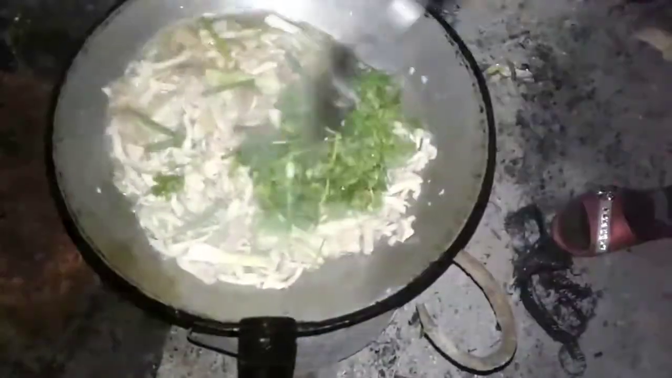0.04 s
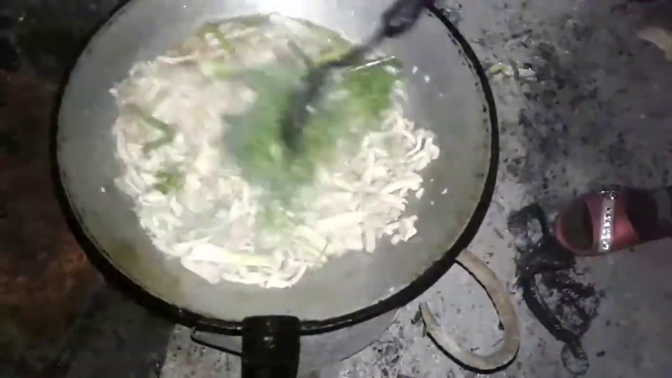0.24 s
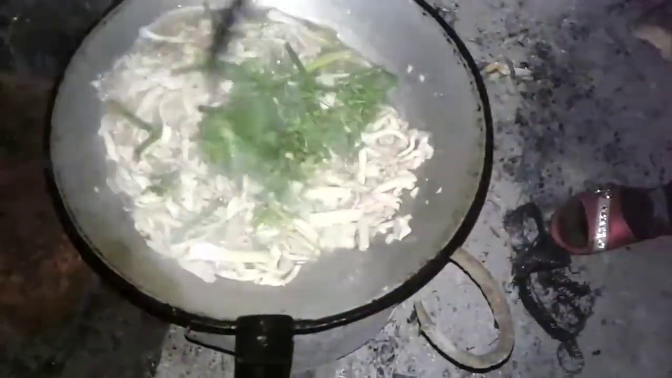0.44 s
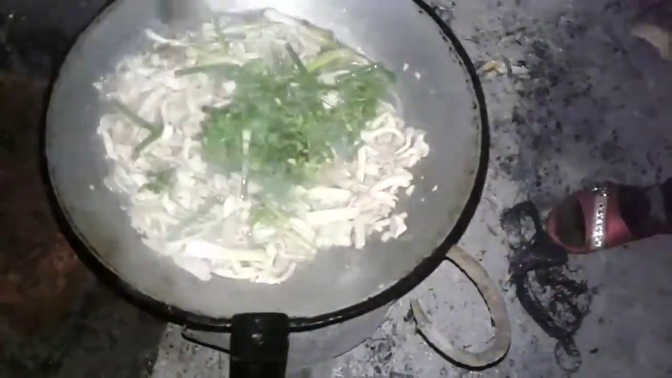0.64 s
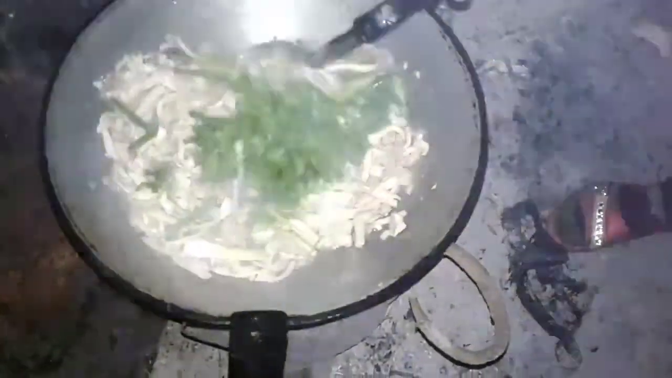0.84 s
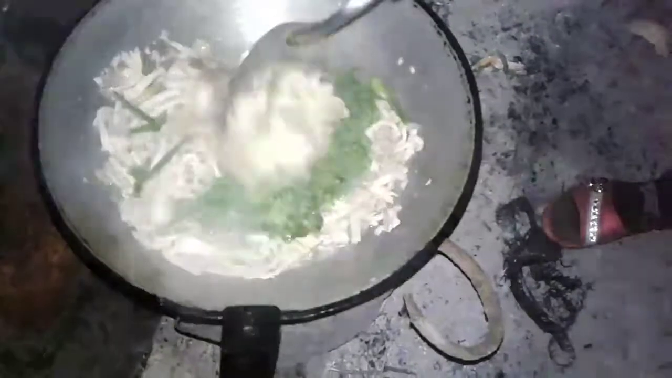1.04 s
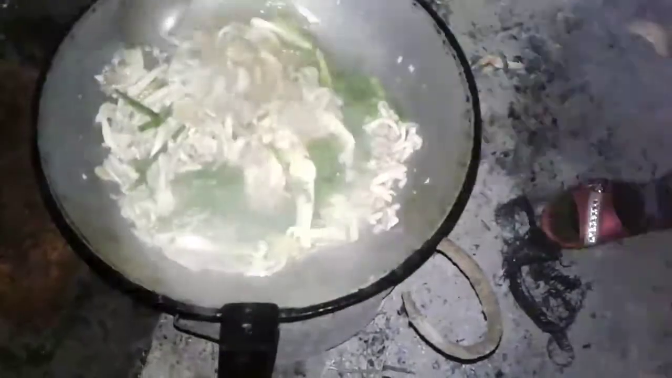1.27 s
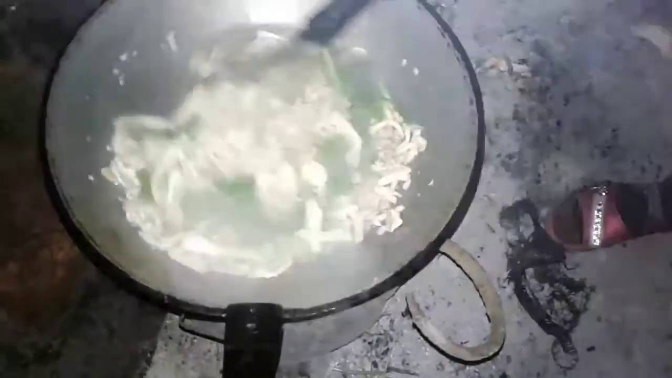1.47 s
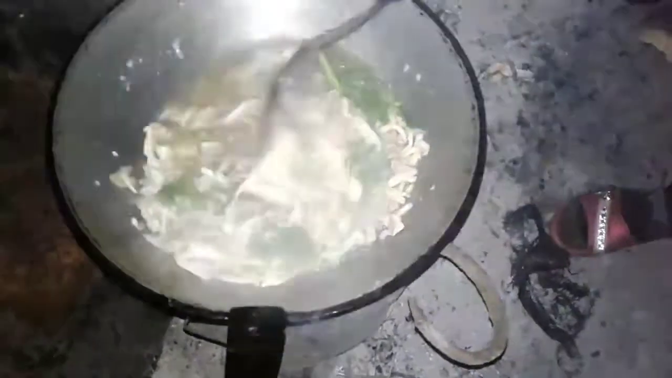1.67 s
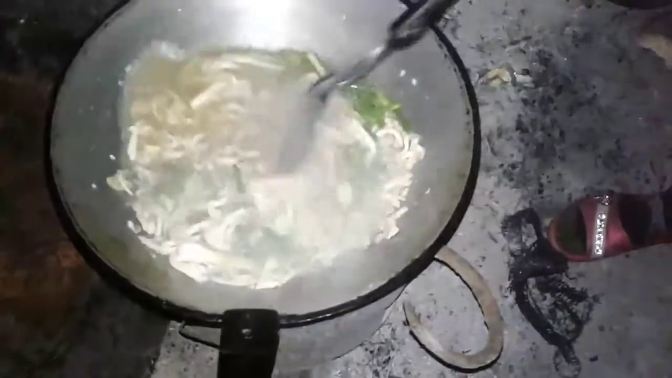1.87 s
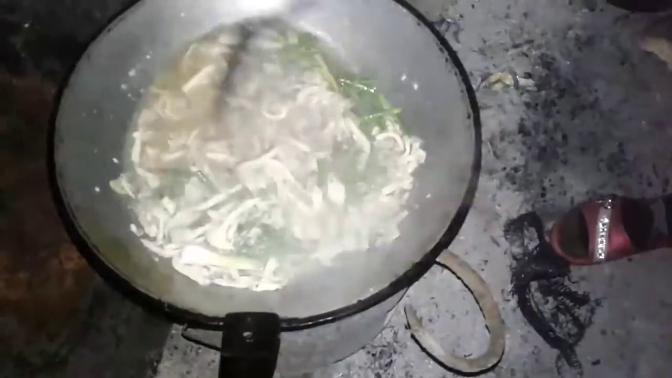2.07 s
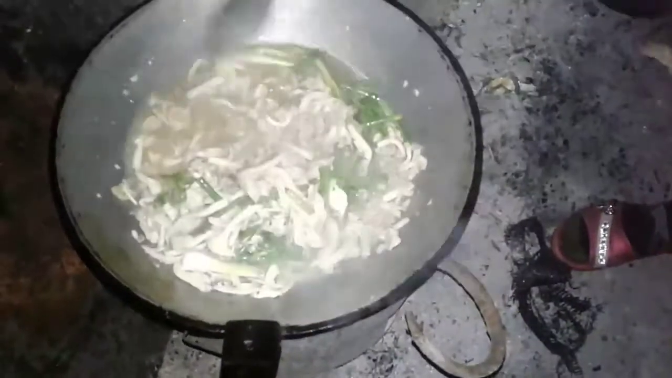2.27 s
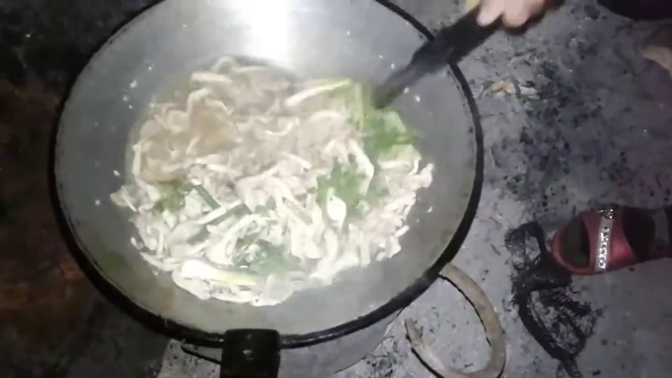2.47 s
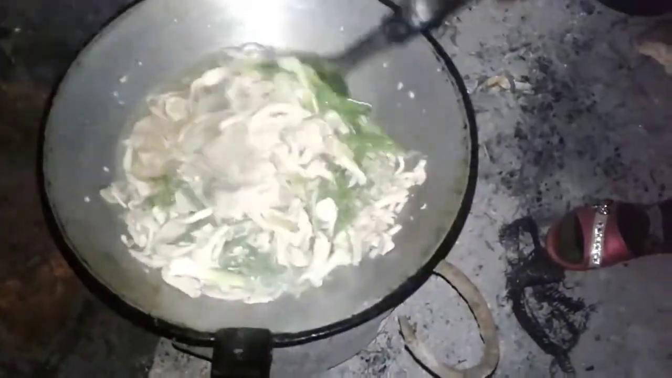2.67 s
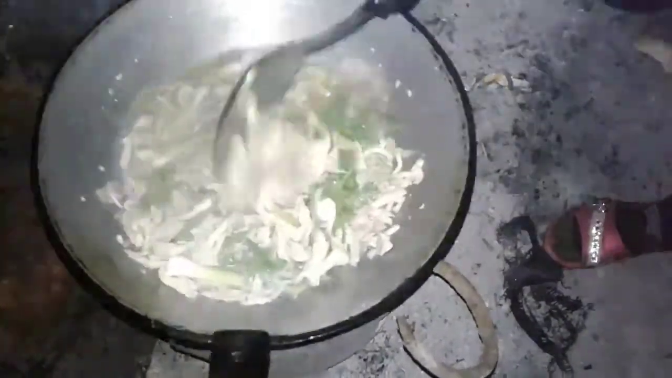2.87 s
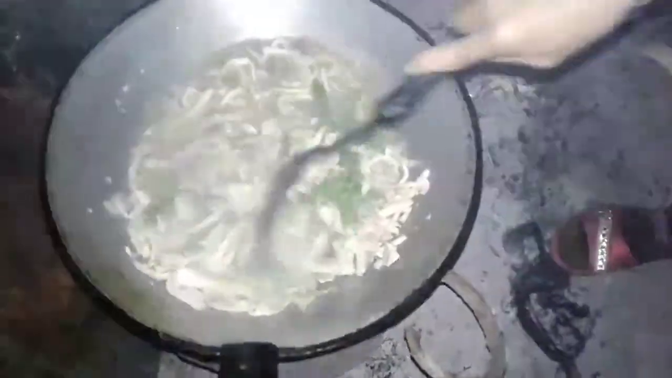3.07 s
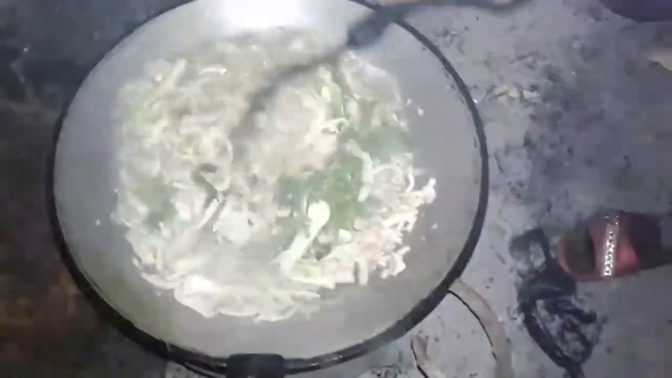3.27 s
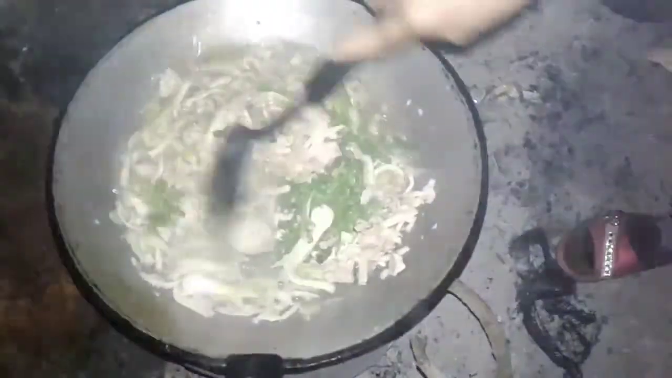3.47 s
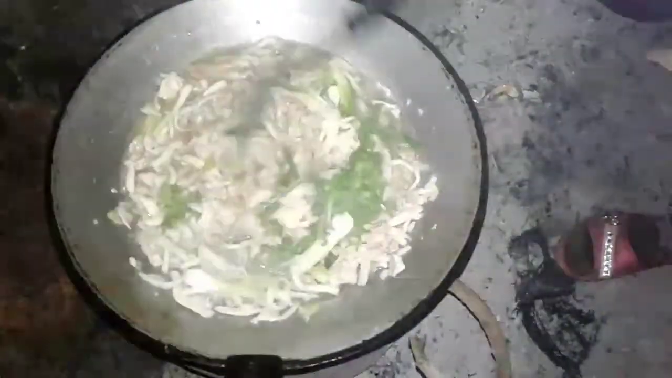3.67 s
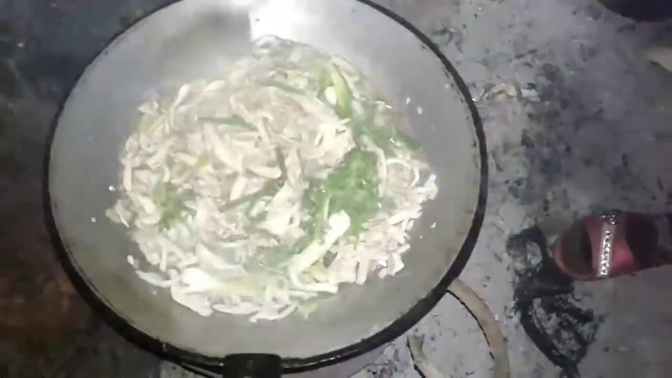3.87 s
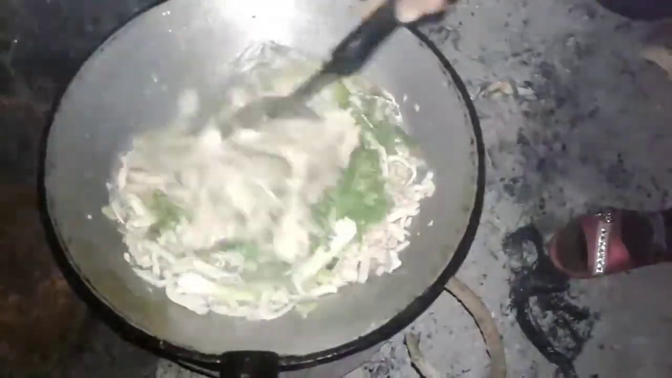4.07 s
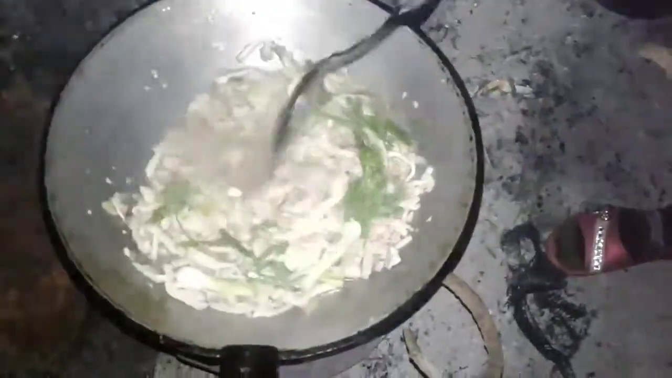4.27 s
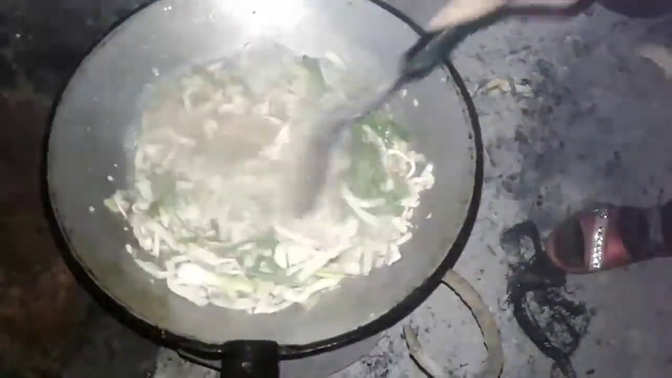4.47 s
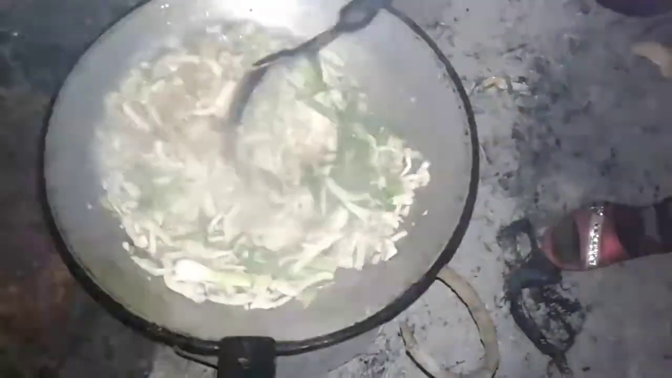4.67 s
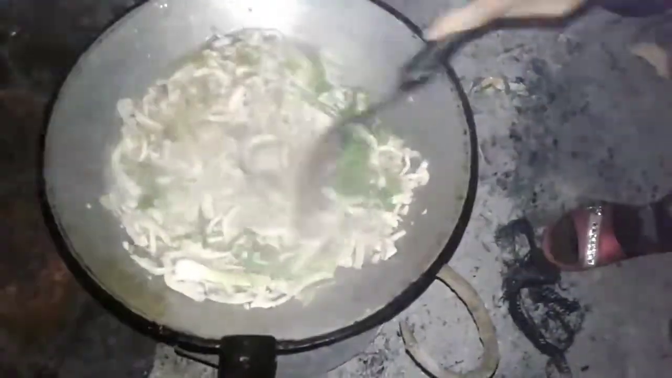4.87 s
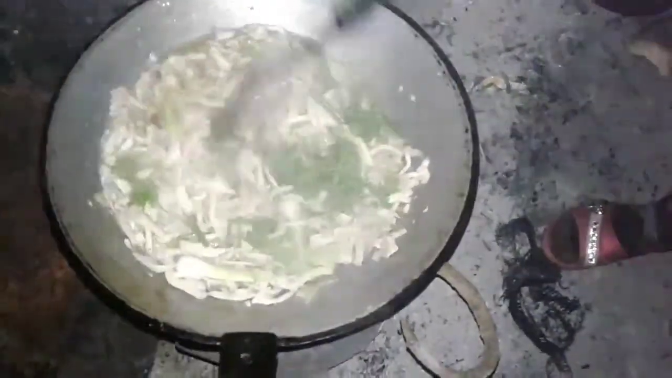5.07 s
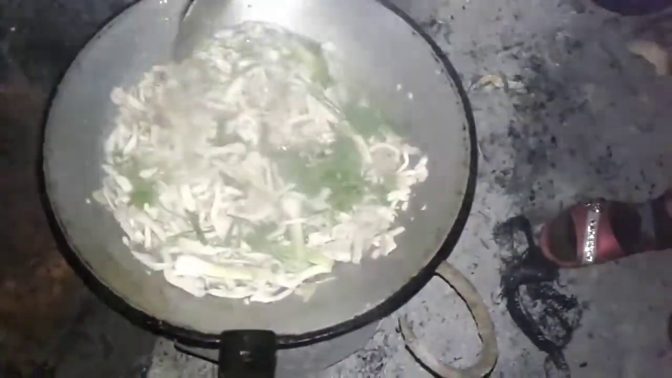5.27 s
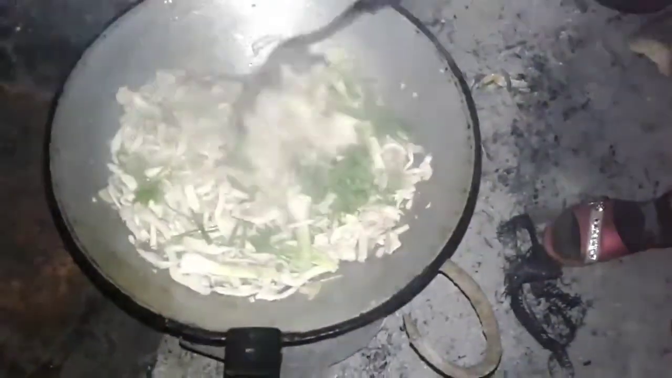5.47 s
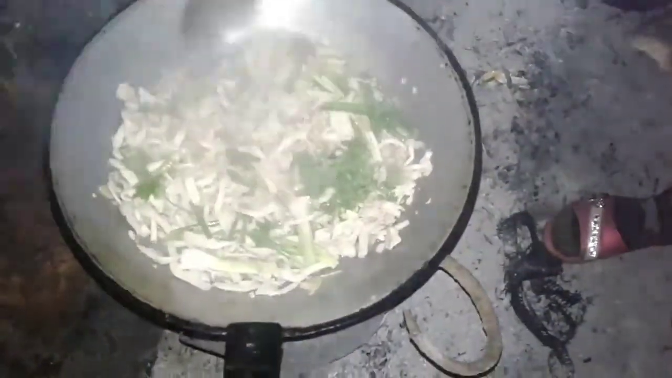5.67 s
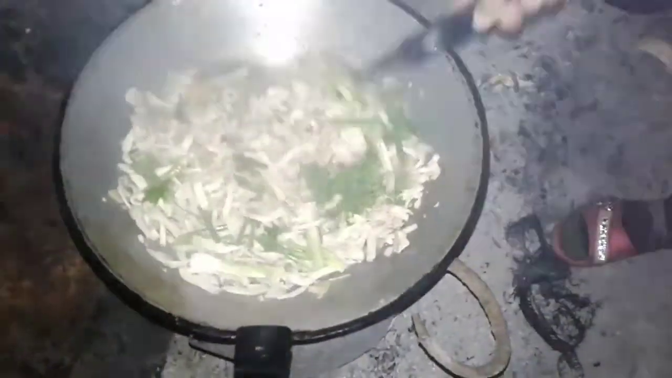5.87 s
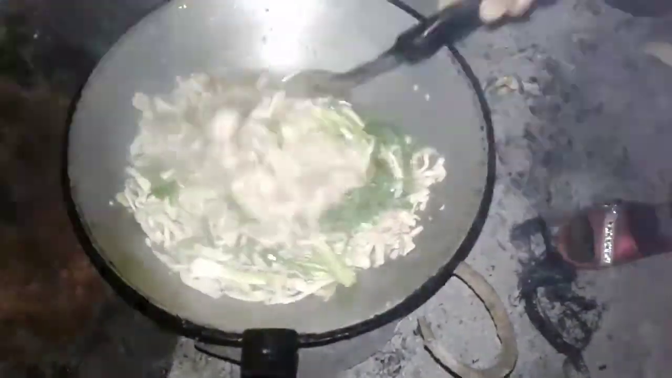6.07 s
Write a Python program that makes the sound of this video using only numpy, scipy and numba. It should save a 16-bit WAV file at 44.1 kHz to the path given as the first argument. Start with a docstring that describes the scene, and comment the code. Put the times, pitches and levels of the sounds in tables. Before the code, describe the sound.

Outdoors at night, a metal spatula stir-fries in a wok close to the microphone, slightly to the right. Four loud, short clacks and one much softer knock each lead into a quick scrape sagging in pitch, with dull wet pats as food is turned. Small oil spits tick. Crickets trill continuously, mostly toward the right, above a quiet flame rumble and faint sizzle.

```python
"""Crickets trill all around over the low rumble of a stove and a faint sizzle: stir-frying outdoors at night.
A metal spatula knocks on the wall of a wok, slides down it and turns the wet food; hot oil spits.
Contact forces drive band-pass modes of the steel, and the food damps them, so each knock is a short clack;
the ring sags in pitch as the blade slides deeper. Insect trills are gliding tones pulsed by wing strokes,
a bush cricket is coloured noise in swells, and the stove and sizzle are filtered noise."""
import sys
import numpy as np
from scipy import signal
from scipy.fft import rfft, irfft
from scipy.io import wavfile
from scipy.ndimage import uniform_filter1d
from numba import njit

SR = 44100
rng = np.random.default_rng(int(sys.argv[2]) if len(sys.argv) > 2 else 0)


def pcm_store(signal):
    """Save signal as 16-bit PCM."""
    levels = np.round(np.clip(np.atleast_2d(signal), -1, 1) * 32767)
    wavfile.write(sys.argv[1], SR, levels.astype(np.int16).T)


N = 270282
T = np.arange(N) / SR  # time [s]


def undb(db):
    """Level to amplitude: 20 dB is a factor of ten."""
    return 10 ** (np.asarray(db) / 20)


def unit(x):
    """Normalisation to an rms amplitude of 1."""
    return x / np.sqrt(np.mean(x ** 2) + 1e-20)


def pan(db):
    """Interaural level difference: left and right gains, left minus right in dB."""
    return undb(np.array([[db], [-db]]) / 2)


def add(track, start_s, sound):
    """Superposition: a sound is summed into a track from its start time."""
    rest = track[max(int(start_s * SR), 0):]
    rest[:len(sound)] += sound[:len(rest)]


def walk(rate):
    """Smoothed random fluctuation: a moving mean over random steps, rate per second, spread near 1."""
    step = int(SR / rate)
    levels = np.repeat(rng.standard_normal(N // step + 1), step)
    return 1.2 * uniform_filter1d(levels, step)[:N]


def colour(x, points):
    """Linear filtering in the frequency domain through points of (frequency [Hz], gain [dB])."""
    hz, db = np.transpose(points)
    f = np.fft.rfftfreq(x.shape[-1], 1 / SR) + 1
    gain = undb(np.interp(np.log(f), np.log(hz), db))
    return irfft(rfft(x) * gain, x.shape[-1])


@njit
def svf(x, hz, width):
    """State-variable resonator: two coupled integrators form a band-pass whose centre may move."""
    y, b, l = np.empty(len(x)), 0., 0.
    for i in range(len(x)):
        g, k = np.tan(np.pi * hz[i] / SR), width / hz[i]
        v = (b + g * (x[i] - l)) / (1 + g * (g + k))
        b, l, y[i] = 2 * v - b, l + 2 * g * v, k * v
    return y


def band(x, hz, width):
    """Simple resonance: one damped mode with gain 1 at its centre, centre and width in Hz."""
    centre = np.clip(hz * np.ones(len(x)), 20, .45 * SR)
    return svf(x, centre, float(width))


def echoes(x, t60):
    """Diffuse reverberation: convolution with decaying noise, unrelated left and right."""
    t = T[:SR // 2]
    # the first 2 ms hold no reflections
    tail = rng.standard_normal((2, len(t))) * undb(-60 * t / t60) * (t > .002)
    tail = tail / np.sqrt(np.sum(tail ** 2, axis=1, keepdims=True))
    return signal.fftconvolve(x[None], tail, axes=1)[:, :N]


def stove():
    """Broadband noise sources: a low flame rumble alike on both sides and a fine, diffuse sizzle."""
    # spectral shape of the flame: (frequency [Hz], relative level [dB])
    flame_spectrum = [(20, -42), (40, -19), (62, -2), (100, -1), (170, -3), (260, -9.5), (500, -16),
                      (1000, -19), (2500, -40)]
    # spectral shape of the sizzle blended with far insects: (frequency [Hz], relative level [dB])
    sizzle_spectrum = [(30, -4), (150, 5), (600, -1.5), (1400, -1.5), (1900, 9), (2550, 0.5), (3500, 6.5),
                       (4500, 5), (5300, 0.5), (7300, 2), (8100, -4.5), (9300, -4.5), (11500, -19),
                       (15500, -21)]
    rumble_db, sizzle_db = -55.5, -53  # before the random drift and the panning
    rumble = unit(colour(rng.standard_normal(N), flame_spectrum))
    rumble = rumble * undb(rumble_db + 1.03 * walk(13))
    sizzle = unit(colour(rng.standard_normal((2, N)), sizzle_spectrum))
    sizzle = sizzle * undb(sizzle_db + .5 * walk(4.68) + 2.34 * walk(250))
    return pan(-0.47) * rumble + pan(-6.0) * sizzle


def wings(hz, rate, glide, duty=0.91, unsteady=.01, flutter_db=2.0):
    """Stridulation: each closing of the wings draws file over scraper, one short gliding tone of uneven strength."""
    strokes = np.cumsum(rate * (1 + unsteady * walk(14))) / SR
    stroke = (strokes + rng.random()) % 1  # position within the stroke, 0 to 1
    pitch = hz * (1 + glide * (stroke - .5) + .008 * walk(110))
    pressure = np.sin(np.pi * np.minimum(stroke / min(duty, 1), 1)) * undb(flutter_db * walk(40))
    return unit(pressure * np.sin(2 * np.pi * np.cumsum(pitch) / SR))


def afar(song, pan_db, wet=1.0, t60=0.21):
    """Direct-to-reverberant ratio: a singer out in the yard is half lost in its reflections."""
    return pan(pan_db) * (song + wet * echoes(song, t60)) / np.hypot(1, wet)


def from_beat(rate, first_s):
    """Phase accumulation: seconds to the nearest beat of a rhythm whose rate may change."""
    beats = np.cumsum(rate) / SR - first_s * rate[0]
    return abs((beats + .5) % 1 - .5) / rate


def singer():
    """Amplitude gating: one cricket's trill comes in phrases, each about twice as long as the pause."""
    # phrase rhythm, which hurries for a while: (time [s], phrase rate [1/s])
    phrase_tempo = [(0, 2.88), (2.5, 2.55), (3.4, 3.12), (4.6, 3.24), (5.3, 2.33), (6.1, 2.91)]
    first_middle_s, duty, ramp_s, level_db = 0.093, 0.67, 0.049, -53.5  # level within a phrase
    tempo = np.interp(T, *np.transpose(phrase_tempo))
    inside_s = duty / tempo / 2 - from_beat(tempo, first_middle_s)  # time within the phrase edges
    gate = np.clip(inside_s / ramp_s + .5, 0, 1)
    song = afar(wings(2972, 59.5, -0.07, duty=0.82, flutter_db=2), pan_db=-4, wet=1.0)
    return unit(song) * undb(level_db) * gate


def bush_cricket():
    """Amplitude-modulated noise: short toothy rasps swell and fade in a loose rhythm."""
    first_s, rasps_per_s, unsteady = 0.12, 4.02, 0.054
    half_width_s, level_db = 0.056, -57.5  # half-width where the swell is 1/e; level before the swell
    rate = rasps_per_s * (1 + unsteady * walk(2.98))
    swell = np.exp(-(from_beat(rate, first_s) / half_width_s) ** 2)
    spectrum = [(3300, 4.5), (3900, -7.0), (4700, 13.0), (5050, 11.0), (5600, -31.5)]
    rasp = unit(colour(rng.standard_normal(N), spectrum))
    return afar(rasp * swell * undb(level_db + 2 * walk(200)), pan_db=-6.5)


def crickets():
    """Superposed stridulation: steady trills, one singer in phrases and a rasping bush cricket."""
    # crickets that trill without pause: (mean pitch [Hz], wing-stroke rate [1/s],
    # glide within a stroke [share of pitch], level [dB], left minus right [dB])
    trill_table = [(2176, 112, -0.0028, -47, -40), (2071, 57, -0.048, -50, -38),
                   (2219, 63, 0.014, -51.5, -4), (2145, 110, -0.12, -49.5, -12),
                   (2188, 95, -0.075, -52.5, -24), (3040, 46, -0.177, -61, -9), (3374, 29, -0.17, -61.5, 3),
                   (6084, 60, 0.19, -61.5, -6), (6430, 69, 0.3, -59, 10), (6820, 51, 0.085, -62, 28),
                   (9020, 48, 0.11, -70.5, 4.5)]
    trills = 0
    for hz, rate, glide, db, pan_db in trill_table:
        trills = trills + undb(db) * unit(afar(wings(hz, rate, glide), pan_db))
    return trills + singer() + bush_cricket()


def faint_spits():
    """Uniformly random arrivals: small droplets burst at any time, as rows like those of the loud spits."""
    per_s, mean_db, mean_ring_db, scatter_db = 1.5, -55, 12, 4
    rows = []
    for when, size, ring in rng.random((int(per_s * N / SR), 3)):
        tick_db = mean_db + scatter_db * (2 * size - 1)
        ring_db = mean_ring_db + scatter_db * (2 * ring - 1)
        rows.append((when * N / SR, tick_db, ring_db))
    return rows


def spits(decay_s=0.0017, spit_db=2, bubble_hz=4700, bubble_db=-2):
    """Bubble resonance: droplets burst in hot oil with a tick and the short ring of a small bubble."""
    # the loudest spits, before the common offsets spit_db and bubble_db:
    # (time [s], peak level [dB], bubble ring relative to that level [dB])
    loud_spits = [(0.073, -44, 9), (3.3378, -56.5, 24), (3.729, -54, 20.5), (4.2133, -47, -4),
                  (4.4882, -42, 2), (4.8599, -50, 14)]
    out, t = np.zeros(N), T[:SR // 50]
    for s, db, ring_db in loud_spits + faint_spits():
        burst = rng.standard_normal(len(t)) * np.exp(-t / decay_s)
        tick = band(burst, 11300, 9000)
        ring = band(burst, bubble_hz, 600)
        tick = undb(db + spit_db) * tick / abs(tick).max()
        ring = undb(db + ring_db + bubble_db) * ring / abs(ring).max()
        add(out, s, tick + ring)
    return out


def steel(force, sag=0.96, body_db=0., treble_db=0., spot_hz=3700, spot_db=0., scatter=0.0063, sag_below_hz=3800):
    """Modal synthesis: a force drives the wok's modes; the contact favours some and shifts the lower ones most."""
    # modes of the wok with the blade on it, before sag and scatter:
    # (frequency [Hz], bandwidth before a floor of frequency / 45 [Hz], gain before tilt and favour [dB])
    modes = [(113, 11.7, -2), (270, 85, -9), (408, 46, -8.5), (617, 94, -5.5), (986, 50, -1.5),
             (1244, 117, -2.5), (1534, 133, 1), (2228, 118, 7), (2610, 41, -3), (2566, 44, 10),
             (2870, 140, 11), (3633, 150, 10), (4038, 42, 11), (4470, 57, 0), (4740, 400, -4),
             (4694, 220, 6), (6000, 270, -16), (7020, 100, -10.5), (7320, 230, -12), (9340, 120, -8.5),
             (9380, 470, -4.5), (10830, 70, -10.5), (13800, 200, -21), (14400, 330, -13)]
    out = 0
    for k, (hz, width, db) in enumerate(modes):
        lowered = sag ** (1 / (1 + (hz / sag_below_hz) ** 4))
        centre = hz * (1 + scatter * rng.standard_normal()) * lowered
        tilt_db = np.interp(hz, [1600, 2400, 4500, 9000], [body_db, 0, 0, treble_db])
        favour_db = spot_db * np.exp(-((hz - spot_hz) / 300) ** 2)
        gain = (-1) ** k * undb(db + tilt_db + favour_db)  # rows alternate in sign
        out = out + gain * band(force, centre, max(width, hz / 45))
    return out


def drops():
    """Jittered arrivals: pieces of turned food fall back at uneven moments, as rows like those of the pats."""
    # the blade turns the food over: (start [s], end [s], typical peak level before the pats' offset [dB])
    turns = [(1.331, 1.5, -43), (2.618, 3.03, -38), (3.56, 3.64, -41), (4.45, 4.6, -37.5),
             (4.82, 4.91, -42)]
    per_s, middle_hz, spread_octaves, scatter_db, steel_share_db = 30, 1320, .7, 4, -7
    rows = []
    for start, end, db in turns:
        slots = np.arange(start, end, 1 / per_s)
        for s, (late, size, pitch) in zip(slots, 2 * rng.random((len(slots), 3)) - 1):
            hz = middle_hz * 2 ** (spread_octaves * pitch)
            rows.append((s + late / per_s / 2, db + scatter_db * size, hz, steel_share_db))
    return rows


def pats(decay_s=0.0043, width_hz=800, pat_db=-2, steel_db=3, splash=0.23):
    """Damped impact: wet food cushions the blade, giving a brief dull pat with a trace of steel."""
    # the clearest pats, before the common offsets pat_db and steel_db:
    # (time [s], peak level [dB], centre frequency [Hz], steel relative to wet part [dB])
    clear_pats = [(0.705, -30, 810, -19), (0.739, -28, 1590, -18), (0.912, -34.5, 1410, -10),
                  (2.386, -25.5, 638, 7), (2.462, -31.5, 1940, -17), (2.648, -31.5, 909, -4),
                  (2.724, -29.5, 1250, 4), (2.807, -30, 1010, 0), (2.99, -29.5, 1020, -1.5),
                  (3.58, -35, 775, -12), (4.083, -31, 700, -25), (4.353, -29.5, 1860, 10),
                  (4.477, -29.5, 1390, -15), (5.802, -34, 683, -16), (5.844, -32, 1370, -24),
                  (5.905, -32.5, 1875, -16)]
    out, t = np.zeros(N), T[:SR // 16]
    for s, db, hz, steel_share_db in clear_pats + drops():
        force = (t == 0) + splash * rng.standard_normal(len(t)) * np.exp(-t / decay_s)
        wet = band(band(force, hz, width_hz), hz, 2 * width_hz)
        ring = steel(force, body_db=3, treble_db=-6)
        # the two parts share the peak level
        share = undb(steel_share_db + steel_db)
        both = wet / abs(wet).max() + share * ring / abs(ring).max()
        add(out, s, undb(db + pat_db) * both / np.hypot(1, share))
    return out


def slides(sag_per_s=2.31, start_pitch=1.005, grain_db=3, judder_db=2, release_db=-19, dry_rub_db=-9, grit_db=-12):
    """Stick-slip friction: tiny slips ring the wok, lower and lower as the blade runs down into the food."""
    # slides down the wall: (start [s], turning point of the slide [s], end [s], rasp at the start [dB],
    # rasp at the turning point [dB], rub through the food before its course with depth [dB])
    slide_table = [(0.547, 0.612, .715, -38.5, -33, -42), (2.19, 2.285, 2.368, -40.5, -33.5, -47),
                   (3.804, 3.813, 3.945, -32, -43, -45.5), (5.242, 5.307, 5.335, -34, -38, -44),
                   (5.642, 5.716, 5.825, -47, -42.5, -43)]
    out, judder = np.zeros(N), undb(judder_db * walk(130))
    for start, turning, end, first_db, turning_db, rub_db in slide_table:
        span = (T > start) & (T < end)
        t = T[span]
        depth = np.interp(t, [start, turning, end], [-1, 0, 1])  # -1 high on the bare wall, 1 deep in the food
        grain = undb(grain_db * np.minimum(rng.exponential(size=len(t)), 4))
        slips = rng.standard_normal(len(t)) * grain * judder[span]
        ring = steel(slips, sag=start_pitch * np.exp(-sag_per_s * (t - start)))
        bright = unit(colour(ring, [(1200, -4), (2300, -5.5), (3600, 3.0), (5000, 4), (9000, -21), (15000, -3)]))
        dull = unit(colour(ring, [(300, -14), (750, 15), (1500, 4.5), (2300, -33), (4000, -46)]))
        # the air pocket under the blade deepens: one hollow resonance falls
        pocket_hz = np.interp(depth, [-0.72, 0.17, 0.43, 0.69], [1650, 1270, 845, 675])
        pocket = unit(band(band(slips, pocket_hz, 220), pocket_hz, 400))
        dull = unit(dull + 1.2 * pocket)
        # the edge spits dry grit, most strongly just before the turning point
        grit = unit(colour(slips, [(1000, -1), (5000, 2.5), (6500, -3.5), (11000, -8), (15000, -21)]))
        grit = grit * undb(grit_db + np.interp(depth, [-1, -.15, .6], [-6, 4, -8]))
        rasp_db = np.interp(depth, [-1, 0], [first_db, turning_db]) + release_db * np.maximum(depth, 0) ** 2
        food_db = rub_db + np.interp(depth, [-0.93, 0.025, 0.23, 1.0], [dry_rub_db / 2, dry_rub_db, 1, -10])
        sound = (bright + grit) * undb(rasp_db) + dull * undb(food_db)
        out[span] += sound * signal.windows.tukey(len(t), .1)
    return out


def knocks(grit=0.12, grit_s=0.0042, edge_db=-3, boom_rise_s=0.0096, crack_db=2, crack_s=0.00082):
    """Impact excitation: the blade lands edge by edge, rebounds and chatters; the whole bowl booms just after."""
    # blade meets wok: (time [s], level [dB], second edge after [s], rebound after [s], rebound level [dB],
    # body tilt [dB], treble tilt [dB], bowl boom level [dB], boom frequency [Hz], ring favoured by the spot [Hz])
    knock_table = [(0.5275, -20, 0.0015, 0.0088, -18, 7, 5, -45.5, 183, 4370),
                   (2.1722, -19, 0.0023, 0.0079, -14, 0.5, 6, -44, 164.5, 3790),
                   (3.802, -35.5, 0.0035, .009, -8, 7, -1, -60, 163, 4200),
                   (5.2345, -21, 0.0017, 0.0092, -13, 1.5, -2.5, -42.5, 167, 2540),
                   (5.6234, -17, .0017, 0.0069, -4.5, -6, 6.5, -42, 173.6, 4360)]
    bowl_t60_s = 0.17
    out, t = np.zeros(N), T[:SR // 4]
    for s, db, edge_s, rebound_s, rebound_db, body_db, treble_db, boom_db, boom_hz, spot_hz in knock_table:
        touches = [(0, 0), (edge_s, edge_db), (rebound_s, rebound_db), (rebound_s + edge_s, rebound_db + edge_db)]
        force = np.zeros(len(t))
        for after_s, push_db in touches:
            chatter = grit * rng.standard_normal(len(t)) * np.exp(-t / grit_s)
            add(force, after_s, undb(push_db) * ((t == 0) + chatter))
        clack = steel(force, body_db=body_db, treble_db=treble_db, spot_hz=spot_hz, spot_db=10.0)
        # only the first touch is hard enough to crack
        snap = rng.standard_normal(len(t)) * np.exp(-t / crack_s)
        crack = band(band(snap, 9900, 1800), 9900, 1800) - band(snap, 14000, 2000)
        crack = undb(crack_db + treble_db) * crack
        boom = np.sin(2 * np.pi * boom_hz * t) * (1 - np.exp(-t / boom_rise_s))
        boom = boom * np.exp(-np.log(1000) * t / bowl_t60_s)
        # levels refer to the first 20 ms of the clack and the first 40 ms of the boom
        clack = undb(db) * (clack / clack[:SR // 50].std() + crack)
        add(out, s, clack + undb(boom_db) * boom / boom[:SR // 25].std())
    return out


def scene():
    """Superposition of direct and reflected sound: the wok close by, the stove under it, insects all around."""
    # the wok stands to the right; its treble is shaded on the left: (frequency [Hz], left minus right [dB])
    shade = [(60, -3), (380, -0.5), (700, -1), (1300, -6.5), (2400, -5.5), (4400, -13.5), (9000, -12.5),
             (15000, -7)]
    right_lag_s = .00012
    wok = knocks() + slides() + pats() + spits()
    near = np.array([wok, np.interp(T - right_lag_s, T, wok)])
    # the bowl throws the clatter back at once; the yard adds a faint tail
    bowl = undb(-13.5) * echoes(wok, t60=0.04)
    yard = undb(-21.5) * echoes(wok, t60=0.14)
    sides = []
    for x, side in zip(near + bowl + yard, (1, -1)):
        sides.append(colour(x, [(hz, side * db / 2) for hz, db in shade]))
    return np.array(sides) + crickets() + stove()


def record(dry):
    """Saturation and band limiting: the highest peaks are rounded and the top is cut above 15.7 kHz."""
    low_pass = signal.ellip(8, .2, 70, 15700, fs=SR, output="sos")
    return signal.sosfilt(low_pass, np.tanh(dry))


dry = scene()
out = record(dry)
pcm_store(out)
```